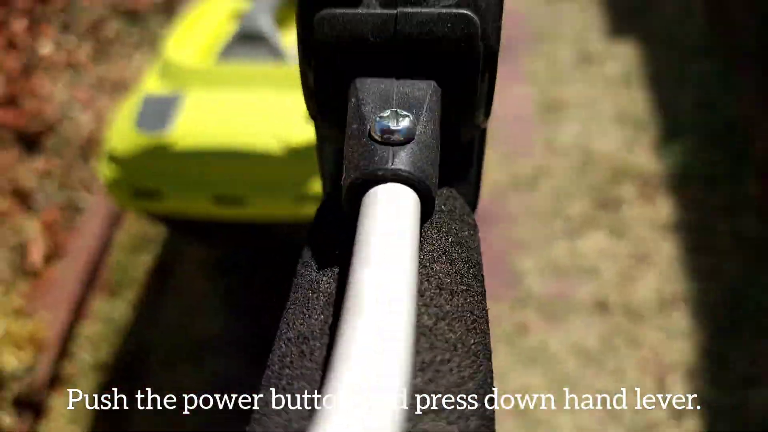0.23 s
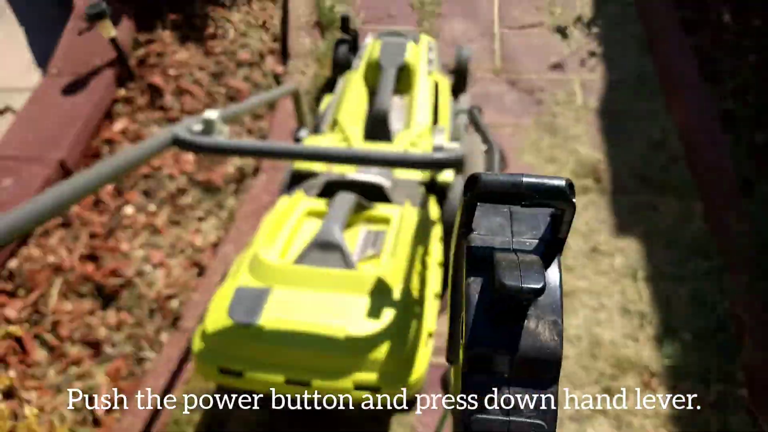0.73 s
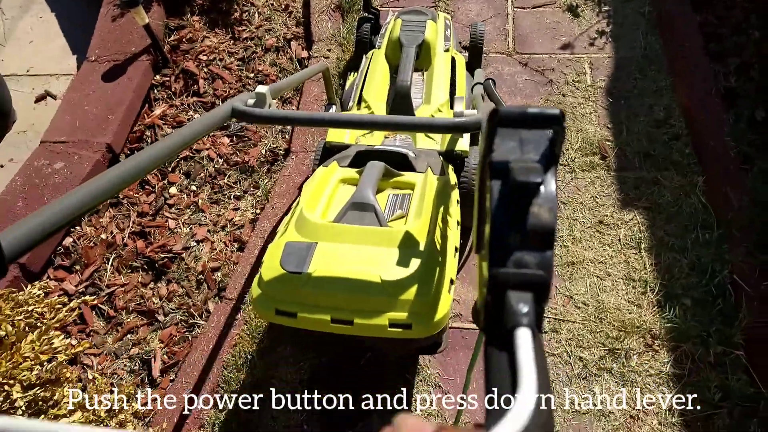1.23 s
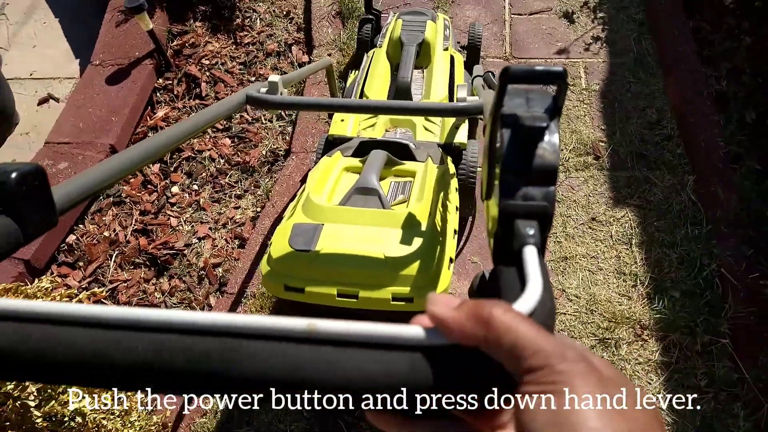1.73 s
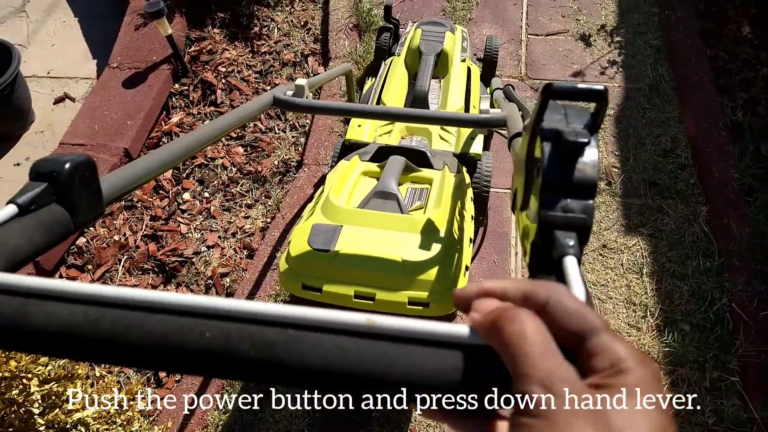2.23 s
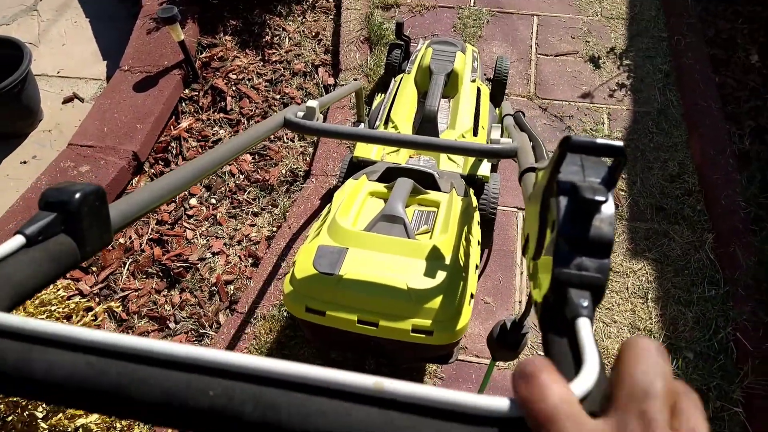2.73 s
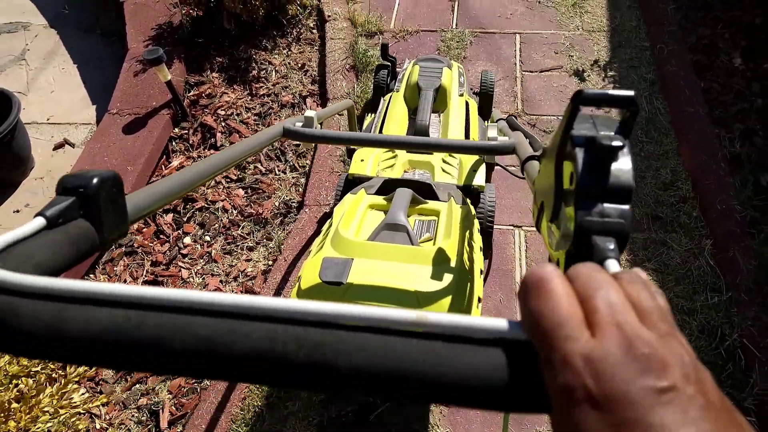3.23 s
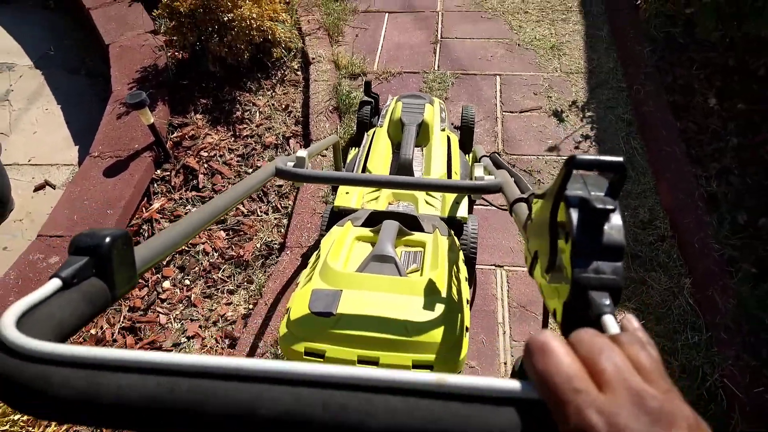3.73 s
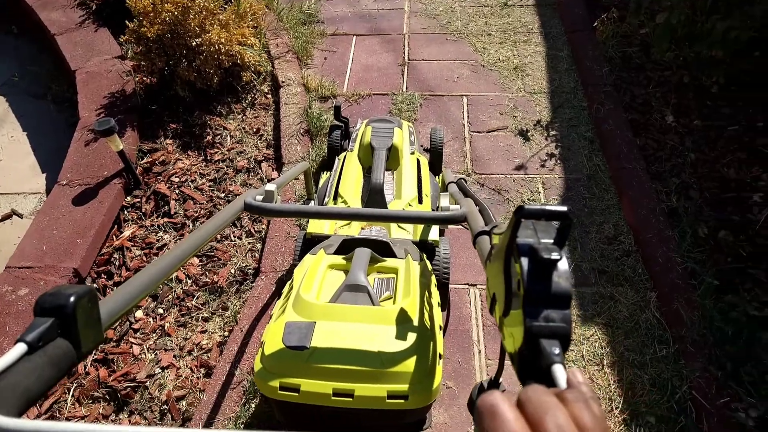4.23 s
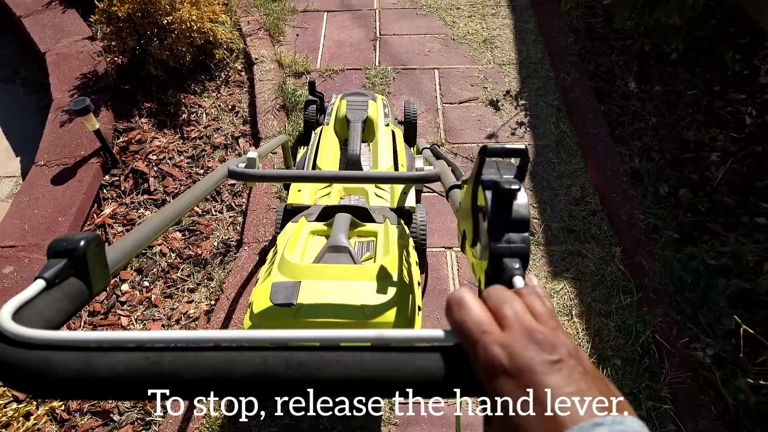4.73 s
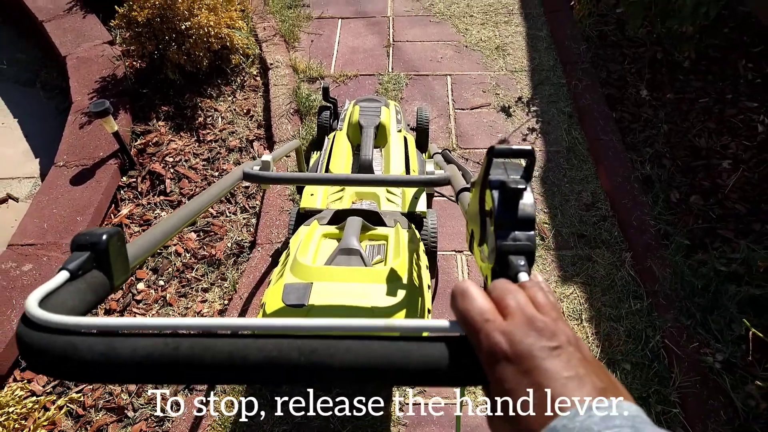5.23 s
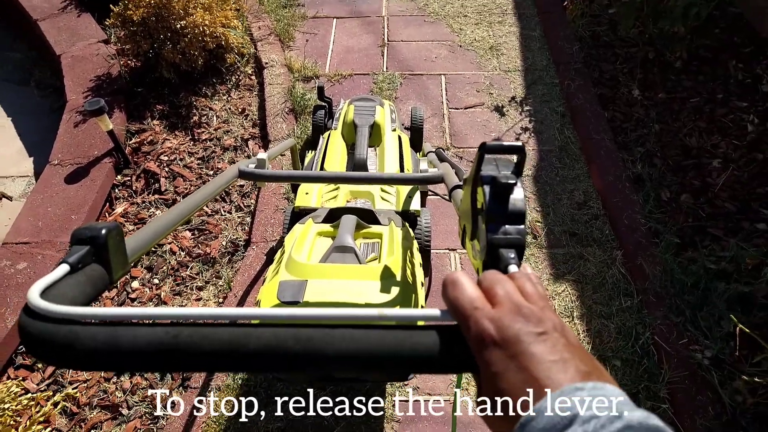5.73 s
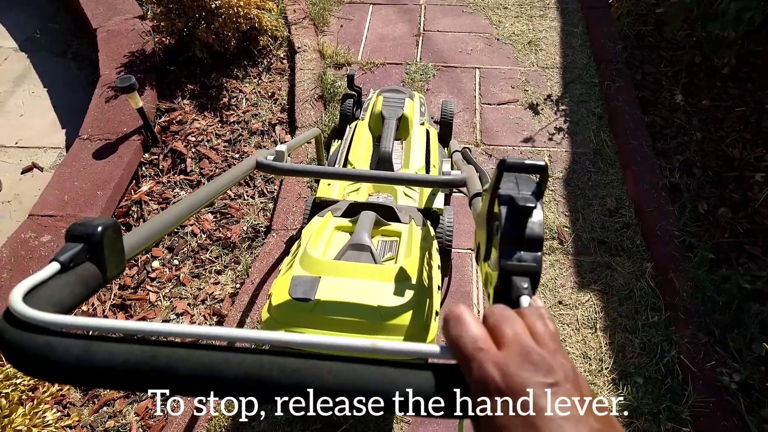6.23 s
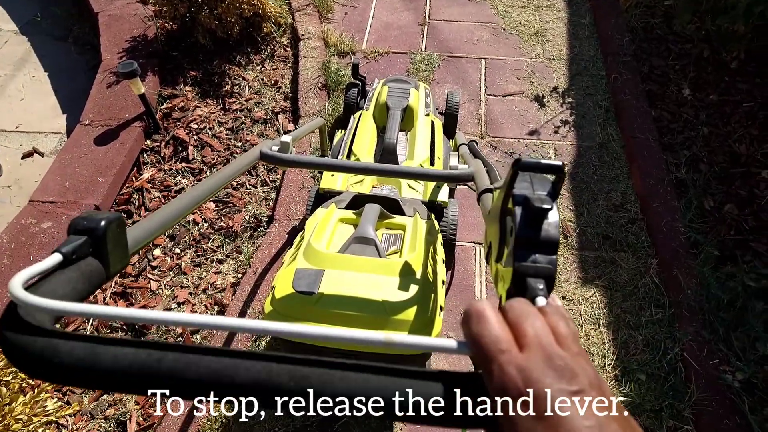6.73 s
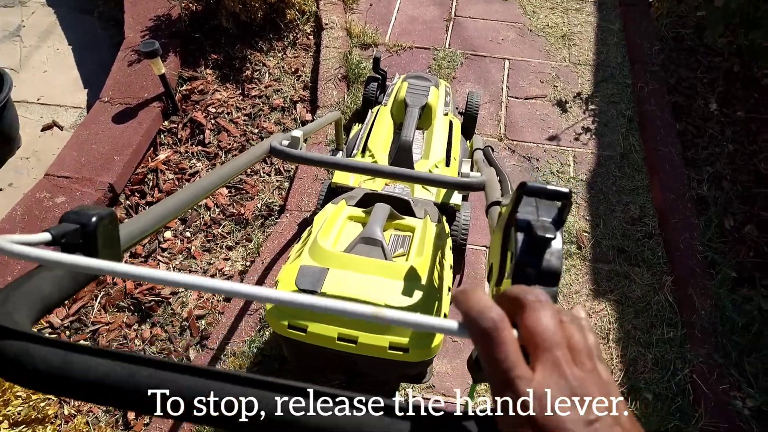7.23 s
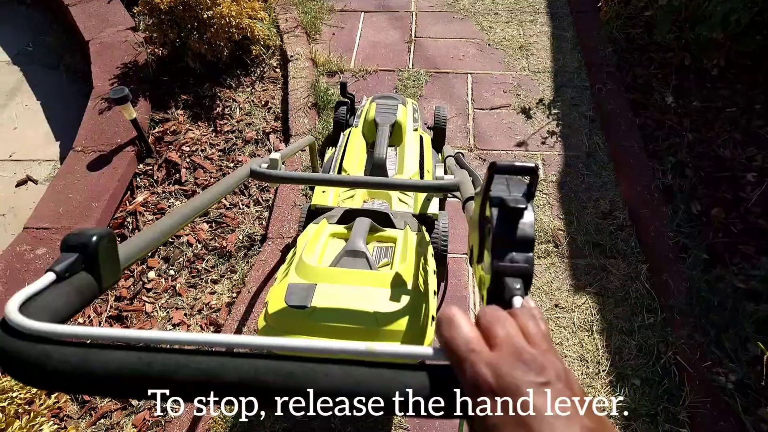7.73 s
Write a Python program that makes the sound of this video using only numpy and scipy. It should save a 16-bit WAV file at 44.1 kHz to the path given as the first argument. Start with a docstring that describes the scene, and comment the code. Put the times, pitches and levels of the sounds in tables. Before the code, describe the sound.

Steady electric mower drone with airy blade roar and shivering high whistle, a short silence, a lever double click, falling run-down, another gap, abrupt return.

```python
"""An electric mower on paving: blade-pass harmonics and turbulent air roar, chopped by the passing blade,
with the motor's whine and a whistle in the deck, as tone lines that waver, below a hand-held microphone pair.
Grit and the handle tick as short noise bursts; the lever is let go with a double click and the blade coasts.
The sound drops out twice and returns, the second time at running speed."""
import sys
import numpy as np
from scipy import signal
from scipy.fft import rfft, irfft
from scipy.io import wavfile
from scipy.ndimage import uniform_filter1d

SR = 44100
rng = np.random.default_rng(int(sys.argv[2]) if len(sys.argv) > 2 else 0)


def dump(signal):
    """Clip the signal to [-1, 1] and save it as 16-bit WAV at the path in sys.argv[1]."""
    limited = np.clip(np.atleast_2d(signal).T, -1, 1)
    pcm = np.round(limited * 32767).astype(np.int16)
    wavfile.write(sys.argv[1], SR, pcm)


N = 352359
T = np.arange(N) / SR
MOTOR_RATIO = 30 / 11  # motor turns per blade-tip pass


def gain_of(db):
    """Level definition: 20 dB is a factor of ten in amplitude."""
    return 10 ** (np.asarray(db) / 20)


def evened(x):
    """Normalisation to unit rms along the last axis."""
    return x / np.sqrt(np.mean(abs(x) ** 2, axis=-1, keepdims=True) + 1e-20)


def read(points, hz):
    """Interpolation of a spectrum table on a log-frequency axis."""
    f, value = np.transpose(points)
    return np.interp(np.log(hz + 1), np.log(f + 1), value)


def columns(rows, t):
    """Linear interpolation in time of every column of a curve table."""
    s, *values = np.transpose(rows)
    return np.array([np.interp(t, s, v) for v in values])


def drift(hz, count):
    """Narrow-band random modulation: low-passed complex noise of rms 1, hz wide."""
    step = 128  # samples between drawn values
    z = rng.standard_normal((count, N // step + 2, 2)) @ np.array([1, 1j])
    pole = np.exp(-np.pi * hz * step / SR)
    z = evened(signal.lfilter([1], [1, -pole], z))
    return np.array([np.interp(np.arange(N) / step, np.arange(z.shape[1]), row) for row in z])


def tones(turns, steady, waver_hz):
    """Phasors on given phase curves; random modulation widens a share of each line."""
    steady = np.clip(steady, 0, 1)
    size = steady + np.sqrt(1 - steady ** 2) * drift(waver_hz, count=len(turns))
    start = rng.random((len(turns), 1))
    return np.sqrt(2) * size * np.exp(2j * np.pi * (turns + start))


def resonance(hz, centre_hz, width_hz):
    """Lorentzian resonance curve with peak 1."""
    return 1 / (1 + (2 * (hz - centre_hz) / width_hz) ** 2)


RELEASE_S, COAST_PER_S = 6.94, .66  # lever let go at t/s; decay rate of the speed in 1/s


def coasting():
    """Exponential run-down under drag: share of speed left, from release to the second drop-out."""
    coasts = (T > RELEASE_S) & (T < np.mean(GAPS[1]))
    return np.where(coasts, np.exp(-COAST_PER_S * (T - RELEASE_S)), 1)


# blade speed before the spin-up lack and the coast: (t/s, tip-pass rate f/Hz)
TIP_SPEED = [(0, 122.4), (1.3, 122.6), (2.5, 123.2), (3.3, 123.1), (3.7, 122.8), (4.9, 122.7), (5.7, 122.2),
             (5.95, 121.7), (6.3, 121.5), (6.94, 121.4), (7.76, 121.7), (8, 121.6)]
SPIN_UP_LACK_HZ, SPIN_UP_S = 7, .33  # lack at the start and its time constant


def tip_speed():
    """Rotor run-up and run-down: the lacking speed and the coasting speed both decay exponentially."""
    lack = SPIN_UP_LACK_HZ * np.exp(-T / SPIN_UP_S)
    return (columns(TIP_SPEED, T)[0] - lack) * coasting()


# as the hand moves: (t/s, nearness level/dB, throb-band level/dB, treble level/dB)
HAND = [(.05, -1.5, 10.5, -4), (.3, -0.54, 7.5, -4), (.9, 0.25, 3.5, 5), (1.6, 1.34, 0.5, -4),
        (2.05, 0.4, 1, -2), (2.8, 1, -1, -1), (3.05, -2.5, -2.5, -2.5), (3.4, -4.5, -3, 0.5),
        (3.7, -6, 2.5, 1), (4.5, -4.5, 0.5, -5.5), (4.9, -6.5, 1.5, -0.5), (5.6, -5.5, 1, -4),
        (6, -1, 0, -5.5), (6.8, 0, 2, -2.5), (7.9, -1.7, 1, -4.5)]


def follow(rows, t):
    """Superposition of decibels from hand position, lost speed and the step after the first drop-out."""
    lost = 1 - np.interp(t, T, coasting())
    causes = np.array([t ** 0, *columns(HAND, t), lost, t > GAPS[0][1]])
    return np.array(rows) @ causes


# layers of air from low to high (roar, drone, throb, rush, hiss, fizz, top), on top of their colour:
# (level/dB, share of nearness, share of throb, share of treble,
#  change at standstill/dB, change after the first drop-out/dB)
AIR_LAYERS = [(1.26, 0.76, -0.22, 0.11, -12, 0.5), (1.3, 0.21, -0.43, 0.04, -21, 2.5),
              (-2, 1.24, 1.06, 0.055, -18.5, -1), (0.48, 1.16, 0.24, 0.069, -22, 1),
              (3.5, 1.04, 0.15, 0.17, -22.5, 0), (8.5, 1.14, 0.076, 0.64, -30, 0.5),
              (9, 1.4, -0.045, 0.63, -28, 0)]
# where one layer hands over to the next: f/Hz
LAYER_EDGES = [540, 870, 1350, 3400, 8200, 11800]


def air_levels(hz, t):
    """Turbulence intensity: levels of crossfaded frequency layers, with random patches on top."""
    count = len(AIR_LAYERS)
    patches = rng.standard_normal((len(hz), len(t)))
    patches = uniform_filter1d(uniform_filter1d(patches, 5, 1), 60, 0)
    steps = np.repeat(np.arange(count), 2)[1:-1]
    edges = np.outer(LAYER_EDGES, [.9, 1.1]).ravel()
    layer = np.interp(np.log(hz + 1), np.log(edges), steps)
    share = np.clip(1 - abs(layer[:, None] - np.arange(count)), 0, 1)
    share[hz < 190] = 1.4 * np.eye(count)[3]  # the deepest rumble follows the rush, more steeply
    return share @ follow(AIR_LAYERS, t) + 1.2 * patches / patches.std()


# broad resonances and dips: (f/Hz, width/Hz, left level/dB, right level/dB,
# left and right change from afar/dB, left and right change when the throb is strong/dB)
DECK_RESONANCES = [(278, 160, 1.5, 2.5, -0.23, 0, 3.5, 4), (860, 120, 0, -2.5, -1, 0, 7, 1.5),
                   (1094, 250, -0.5, 1, -1, 0, 1.5, 5), (1420, 220, 2, 5, 2, 1, -1.5, -6),
                   (1625, 130, 1, 3.5, -1, -1, 1, 1.5), (1740, 90, -1.5, 0.5, -2, -2, 5, 2.5),
                   (1875, 110, 3.5, 2.5, 1, 1, -1, -3), (2020, 70, -2, -2, -1, -1, 0, -1),
                   (2120, 76, -0.5, 2, 1, 1, -0.5, -0.5), (2470, 160, -0.5, 1, 0, 0, -2, -3.5),
                   (2720, 160, -2, -1.5, 0.15, 0, -3, -3.5), (2860, 140, 2, -0.5, 2, 2, -6.5, -3.5),
                   (3690, 560, 6, 4.5, -0.49, -0.53, 0, 1.5), (4570, 300, 0.5, 1.5, 0.55, 0.82, 2.5, 3.5),
                   (5350, 300, -0.5, 2, 2, 2, 4.5, 3.5), (5800, 250, -1, 3, 0, 0, 2, 1),
                   (7500, 520, 4, -4, 0.26, 0, -1, -2), (13620, 980, 1, -5, 0, 0, -1, 1)]
FAR_DB, THROB_DB = -7, 9  # nearness and throb level at which those changes are whole
# bands that swell for a while: (f/Hz, width/Hz)
RIDGES = [(700, 280), (1000, 270), (1870, 89), (2860, 200), (4250, 200), (13600, 1200)]
# their lift: (t/s, then level/dB for each band)
RIDGE_LIFT = [(.05, 0, 0, 4, -8, 1, -1), (.9, 0, 0.18, 0, 6, 4, 0), (1.5, -1.5, 0, 2.5, 3, 2, 0),
              (2.1, -0.5, 0, -1, -1, 6, 3), (2.8, -0.5, 0, -1, -2, -1, -3), (3.2, 1.5, 0.3, 6, 3, 0, 3),
              (3.7, 3.5, 0.85, 4, 5, 0, 6), (4.3, -1.5, 0.24, -1, 3, -1, 2),
              (4.9, 0, 0.16, -1, 0.5, -3, -2), (5.6, -3, 1, -1, -2, -3, -2.5),
              (6, -1, 2.2, -1.5, -4, -2, -1), (6.9, 0.5, 0.22, 0, -1.5, 1, -1.5), (7, 0, 0, 0, -1, -1, 0),
              (7.15, -1, 0.053, 1, 2, 2, 0), (7.35, 0, 0, 0, -1, 1, 1), (7.55, 1.5, 0, -4, -1, 0, 0),
              (7.8, 0.5, 2, 3, -2, 0, -1)]
RIPPLE_DB = 1.5


def deck_response(hz, t):
    """Resonance and interference: broad peaks, swelling bands and narrow drifting reflection ridges."""
    near_db, throb_db, _ = columns(HAND, t)
    shapes = sum(np.outer(db, resonance(hz, f, width)) for f, width, *db in DECK_RESONANCES)[:, :, None]
    deck_db = shapes[:2] + shapes[2:4] * near_db / FAR_DB + shapes[4:] * throb_db / THROB_DB
    for (f, width), lift_db in zip(RIDGES, columns(RIDGE_LIFT, t)):
        deck_db += np.outer(resonance(hz, f, width), lift_db)
    ripple = rng.standard_normal((2, len(hz), len(t)))  # other for each microphone
    ripple = uniform_filter1d(uniform_filter1d(ripple, size=3, axis=1), size=200, axis=2)
    return deck_db + RIPPLE_DB * evened(ripple) * (hz > 700)[:, None]


# relative noise spectrum of the air: (f/Hz, density level/dB)
AIR_COLOUR = [(18, -76), (30, -47), (108, -29), (173, -12), (342, -4.5), (421, -12), (493, -6.5),
              (1050, -15), (3240, -19.5), (4000, -18.5), (4800, -25), (7490, -22.5), (11100, -41),
              (13700, -34), (15600, -47.5)]
# likeness of the two microphones: (f/Hz, share from 0 to 1)
LIKENESS = [(60, 1), (300, 0.94), (700, 0.54), (1150, 0.3), (1700, 0.31), (2300, 0.86), (3200, 0.55),
            (6000, 0.43), (12000, 0.21)]
# balance of the two microphones: (f/Hz, left over right level/dB)
TILT = [(60, 7), (110, 6), (200, -2.5), (380, -0.5), (700, -3), (1290, -2), (2380, -0.5), (4400, 0.5),
        (8120, -1), (15000, -1.5)]
AIR_LEAN_DB = 0.8  # treble air, left over right, on top of the balance
AIR_LAG = 19  # samples by which treble reaches the left microphone later


def air(passes):
    """Turbulent noise with partial coherence; amplitude modulation by the tips chops it above 700 Hz."""
    frames, hz = N // 256 + 5, np.fft.rfftfreq(1024, 1 / SR)
    t = np.arange(frames) * 256 / SR
    colour_db = read(AIR_COLOUR, hz)
    size = gain_of(colour_db[:, None] + deck_response(hz, t) + air_levels(hz, t))
    size /= np.linalg.norm(gain_of(colour_db))
    a, b, c, d = rng.standard_normal((4, len(hz), frames))
    left, other = a + 1j * b, c + 1j * d
    same = np.clip(read(LIKENESS, hz), -1, 1)[:, None]
    lag = 2 * np.pi * hz * AIR_LAG / SR * np.clip((hz - 1200) / 600, 0, 1)  # bass arrives at both at once
    right = (same * left + np.sqrt(1 - same ** 2) * other) * np.exp(1j * lag)[:, None]
    lean_db = np.clip(hz / 1500, 0, 1) * AIR_LEAN_DB + read(TILT, hz)
    lean = gain_of(lean_db[:, None] / 2)
    z = np.array([left * lean, right / lean]) * size
    low = signal.istft(z * (hz < 700)[:, None], nperseg=1024, noverlap=768)[1][:, :N]
    high = signal.istft(z * (hz >= 700)[:, None], nperseg=1024, noverlap=768)[1][:, :N]
    chop = 1 + sum(m * np.cos(2 * np.pi * (k + 1) * passes) for k, m in enumerate([.22, .22, .08]))
    return gain_of(-22) * (low + high * chop)


# low tones: (level/dB, share of nearness, share of throb, share of treble,
# change at standstill/dB, change after the first drop-out/dB)
HUM_LEVELS = [(-32, 0.79, 0.48, 0.0026, -34.5, 3.5), (-29.5, 1.7, 0.85, 0.0011, -24, -4),
              (-25, 0.97, 0.039, 0, 9, -1.5), (-26, 1.15, -0.043, 0.0035, -11.5, 0),
              (-29.5, 0.53, -1.3, 0.0042, -83, 3.5), (-37.5, 0, -.3, 0, -32, 3.5),
              (-47.5, 0.66, 0.29, 0.00079, 22, 7), (-43, .6, 0, 0, 0, 3.5), (-48, 0.42, .3, 0, -20.5, 4),
              (-45, 1, -0.01, 0.0044, -27.5, -2.5)]
# their frequencies in multiples of the tip pass
HUM_ORDERS = [1, 2, MOTOR_RATIO, 3, 4, 5, 7, 6, 8, 9]
# phase by which the left microphone lags, for each tone: (angle/rad)
HUM_LAG = [.6, .2, .3, .05, .1, .1, .1, .1, .2, .3]
# tones swell and sink as microphones and pitch move:
# (t/s, level/dB on the 2nd, motor, 3rd, 7th, 9th, 1st, 5th order)
HUM_SWELL = [(.05, -2, 1, 5, -1, -1, 1.5, 0), (.5, 4, 0, -2, 13, 3.5, -0.5, 0),
             (.95, -1.5, -1, -4, -4, 3, -2, 0), (1.4, -2.5, 0, -8, -5, 3, -0.5, 0),
             (2.1, 1.5, 0.5, 2, -2, -9, 2, 0), (2.8, -1.5, -0.5, 1, -1, -9, -1.5, 0),
             (3.3, -2, 2.5, 5, -10, -6, 1.5, 0), (3.7, 1, 2.5, -1.5, -7, -4.5, 0.5, 0),
             (4.9, 0.5, -1, -1.5, 8, -4, 0.5, 0), (5.6, -3, -1.5, 0, 2, 0, -0.5, 0),
             (6, 4.5, 0.5, 0.5, 3.5, -3, -0.5, 0), (6.9, -2, 0.5, 2.5, 0, -6, -0.5, 0),
             (7.07, 0.5, -1, 0, -3, -3.5, 1.5, 5), (7.2, 1, 4, 4.5, 1, -1, 2, 4),
             (7.32, -1, 2.5, 1.5, 3, -3, 4, 2), (7.42, -1, -1.5, -2, -2, -3, 1, -3),
             (7.55, 3, 0.5, -3, -4, -3, -2, 0), (7.8, 5, 1, 2, 6.5, -3, 0, 0)]
# index of the low tone that each swell column moves
SWELL_ROWS = [1, 2, 3, 6, 9, 0, 5]
# weak tones: multiples of the tip pass
FAINT_ORDERS = [.5, 2 * MOTOR_RATIO, 4 * MOTOR_RATIO, 11, 15, 17, 21]
# their level/dB on top of the roar layer's level
FAINT_LEVELS = [-57, -40, -50, -50, -49.5, -49, -51.5]


def hum(passes, roar_db):
    """Harmonic series of a rotor: blade and motor-shaft orders, nearly alike in both microphones."""
    level_db = follow(HUM_LEVELS, T)
    level_db[SWELL_ROWS] += columns(HUM_SWELL, T)
    strong = gain_of(level_db) * tones(np.outer(HUM_ORDERS, passes), .99, 5)
    faint = gain_of(roar_db + np.c_[FAINT_LEVELS]) * tones(np.outer(FAINT_ORDERS, passes), 0.88, 3.8)
    half_lag = np.exp(.5j * np.c_[HUM_LAG])
    pair = np.array([(strong / half_lag).real.sum(0), (strong * half_lag).real.sum(0)])
    return pair + faint.real.sum(0)


# main high lines before they sink in the coast: (t/s, deck whistle left level/dB, right level/dB,
# motor whine left level/dB, right level/dB)
MAIN_LINES = [(.05, -24.5, -30, -36, -53), (.17, -22, -35, -27, -40), (.45, -28.5, -21.5, -48, -35),
              (.95, -26.5, -64, -59, -42), (1.5, -25, -21, -44, -54), (2.3, -24, -26.5, -45, -38),
              (2.9, -22.5, -27, -35, -48), (3.2, -26, -26, -46, -42), (3.35, -27, -24.5, -40, -35),
              (3.7, -47, -25.5, -27, -36), (4.1, -36, -23, -29.5, -41), (4.55, -31, -31.5, -34.5, -39),
              (4.75, -38, -55, -44.5, -31.5), (5.6, -38.5, -48, -35.5, -30),
              (6.05, -28.5, -54.5, -28.5, -32), (6.5, -26.5, -46, -30, -26.5),
              (6.9, -27.5, -36.5, -36, -26), (7.02, -34, -39.5, -43, -40.5), (7.07, -27, -36, -37, -37),
              (7.13, -25, -33, -35.5, -30), (7.18, -27, -34.5, -38.5, -30.5),
              (7.23, -32, -37.5, -45, -35.5), (7.3, -37, -56, -43, -44), (7.38, -33, -50, -41, -42),
              (7.44, -42, -52, -39, -39), (7.55, -50.5, -54.5, -55.5, -44), (7.8, -33.5, -43.5, -29.5, -32)]


def main_levels(speed):
    """Near-field mix: each microphone has its own levels, which sink once the speed is far down."""
    return columns(MAIN_LINES, T) - 60 * np.clip(122.5 / speed - 1.3, 0, 1)


def side_loss(speed):
    """Modulation depth falls with speed: level change of side lines below running speed, in dB."""
    return -200 * np.clip(122.5 / speed - 1.04, 0, 1)


COAST_BREAKUP = .85  # share of steadiness lost per share of speed lost: coasting lines turn rough


def line_family(main, sides, main_db, sides_db, steady, waver_hz, lag):
    """Main line and side lines with random modulation, delayed on the left."""
    steady = steady - COAST_BREAKUP * (1 - coasting())
    lines = tones(np.r_[main[None], sides], steady, waver_hz).real
    out = np.zeros((2, N))
    for ear in range(2):
        # side lines fade slowly at random, apart in each microphone
        fading_db = 2 * drift(.3, count=len(sides)).real
        heard_db = np.r_[main_db[ear][None], sides_db + fading_db]
        out[ear] = np.roll((gain_of(heard_db) * lines).sum(0), lag * (1 - ear))
    return out


# side lines of the whistle: mostly whole tip passes away, one about half a pass below
WHISTLE_STEPS = [-3, -2, -1, -.45, 1, 2, 3, 4]
# their level/dB against the whistle as the louder microphone hears it
WHISTLE_SIDES = [-25, -25, -21, -17.5, -13.5, -21, -26, -26]
WHISTLE_HZ, WHISTLE_WAVER_HZ = 3890, 45  # pitch near running speed; width of the random waver
WHISTLE_LAG = 21  # samples by which it reaches the left microphone later


def deck_whistle(speed, passes):
    """Flow-excited whistle: air speed pulls its shivering pitch, and side lines flank it."""
    wobble_hz = 5 * drift(40, count=1)[0].real
    whistle = np.cumsum(WHISTLE_HZ * (speed / 122.5) ** .08 + wobble_hz) / SR
    sides = whistle + np.outer(WHISTLE_STEPS, passes)
    main_db = main_levels(speed)[:2]
    sides_db = main_db.max(0) + side_loss(speed) / 2 + np.c_[WHISTLE_SIDES]
    return line_family(whistle, sides, main_db, sides_db, .94, WHISTLE_WAVER_HZ, WHISTLE_LAG)


# side lines around the whine, whole tip passes away from it: multiples of the tip pass
WHINE_ORDERS = [38, 56, 57, 58, 59, 61, 62, 63, 64, 65, 68]
# their level/dB on top of the hiss layer's level
WHINE_SIDES = [-53.5, -46, -58, -49, -55, -47, -45, -53, -46, -54, -45]
WHINE_LAG = 18  # samples by which it reaches the left microphone later


def motor_whine(speed, passes, hiss_db):
    """Rotation-locked whine at 60 tip passes, with side lines whole tip passes away from it."""
    main_db = main_levels(speed)[2:]
    follow_db = 0.26 * (main_db.max(0) + 33.5)  # side lines follow the main line weakly
    sides_db = hiss_db + side_loss(speed) + follow_db + np.c_[WHINE_SIDES]
    sides = np.outer(WHINE_ORDERS, passes)
    return line_family(60 * passes, sides, main_db, sides_db, .985, 15, WHINE_LAG)


# the lower motor line before it sinks with speed: (t/s, level/dB on top of the hiss layer's level)
SLOT_LEVEL = [(.05, -41), (.15, -42), (.3, -44), (.6, -41.5), (.95, -48.5), (1.75, -43.5), (2.5, -50.5),
              (3.1, -60), (3.6, -45.5), (4.9, -42), (5.6, -39.5), (6, -41.5), (6.8, -40), (7.8, -42.5)]
SLOT_ORDER = 16 * MOTOR_RATIO  # in tip passes
SLOT_COAST_DB, SLOT_MATE_DB = -160, -9  # change at standstill; weaker line one motor order below


def lower_motor_line(speed, passes, hiss_db):
    """Shaft-order pair: a thin line at 16 motor turns and its mate at 15, sinking with speed."""
    level_db = hiss_db + columns(SLOT_LEVEL, T)[0] + SLOT_COAST_DB * np.clip(1 - speed / 121.4, 0, 1)
    lines = tones(np.outer([SLOT_ORDER, SLOT_ORDER - MOTOR_RATIO], passes), .96, 15).real
    slot = gain_of(level_db) * (gain_of([0, SLOT_MATE_DB]) @ lines)
    return np.array([np.roll(slot, WHINE_LAG), slot])


# faint motor lines, in multiples of the tip pass
COAST_ORDERS = [24 * MOTOR_RATIO, 32 * MOTOR_RATIO]
COAST_RING_HZ, COAST_RING_WIDTH_HZ, COAST_RING_DB = 7100, 600, -45


def coast_ring(speed, passes):
    """Swept resonance: faint motor lines ring as they slide through 7 kHz."""
    offset = 2 * (np.outer(COAST_ORDERS, speed) - COAST_RING_HZ) / COAST_RING_WIDTH_HZ
    through = 1 / (1 + offset ** 4)
    ring = gain_of(COAST_RING_DB) * (through * tones(np.outer(COAST_ORDERS, passes), .7, 15).real).sum(0)
    return np.array([np.roll(ring, WHINE_LAG), ring])


HAND_LAG = 8  # samples by which sounds at the handle reach the left microphone later
CLICK_LIKENESS = 0.5  # of the two microphones


def add_click(out, s, db, centre_hz, lean_db, spread, ms, rise_ms):
    """Impact excitation: band-shaped noise with a linear rise and a Gaussian decay."""
    hz, t_ms = np.fft.rfftfreq(1024, 1 / SR), 1000 * np.arange(1024) / SR
    colour = 1 / (1 + ((hz - centre_hz) / (spread * centre_hz)) ** 2)
    colour *= hz / (hz + centre_hz / 5)  # less bass
    a, b = rng.standard_normal((2, 1024))
    other = CLICK_LIKENESS * a + np.sqrt(1 - CLICK_LIKENESS ** 2) * b
    burst = irfft(rfft([a, other]) * colour)
    burst *= np.minimum(t_ms / rise_ms, 1) * np.exp(-(t_ms / max(ms, .3)) ** 2)
    burst *= gain_of(db + np.c_[[lean_db, -lean_db]] / 2) / abs(burst).max(1, keepdims=True)
    at = round(s * SR)
    out[0, at + HAND_LAG:at + HAND_LAG + 1024] += burst[0]
    out[1, at:at + 1024] += burst[1]


# grit and handle ticks: (t/s, peak level/dB before the left-right lean, decay length/ms)
TICKS = [(1.0555, -12, 3.4), (1.085, -22, 3.4), (1.1194, -19, 3.4), (1.451, -15, 3.4), (1.648, -10, 3.9),
         (3.4294, -25, 4), (3.6491, -21, 3), (3.654, -23, 8), (3.6825, -21, 3), (3.718, -21, 8.6),
         (3.7658, -23, 7), (3.9005, -26, 5), (4.4802, -31, 3), (4.5062, -30, 3), (5.1816, -24, 3),
         (5.187, -30, 6), (5.355, -25, 1.95), (5.568, -21, 2), (5.589, -26.5, 9), (6.1413, -26.5, 3.4),
         (6.7136, -17, 3.4)]
TICK_HZ, TICK_SPREAD = 8000, 0.8  # centre, and half-width as a share of it
TICK_LEAN_DB, TICK_RISE_MS = 5, .16  # left over right; rise time


def ticks():
    """Impulsive contact: short bright bursts from grit and the handle."""
    out = np.zeros((2, N))
    for s, db, ms in TICKS:
        add_click(out, s, db, TICK_HZ, TICK_LEAN_DB, TICK_SPREAD, ms, TICK_RISE_MS)
    return out


# a double click of the lever, built from short overlapping bursts of different colour:
# (t/s, peak level/dB before the lean, centre f/Hz, left over right level/dB)
LEVER_BURSTS = [(6.9333, -3, 5500, 5), (6.9505, -3, 5800, 0), (6.9507, -9, 1500, 0), (6.9525, -10, 4800, 0),
                (6.9546, -9, 1800, 1), (6.9566, -8, 3900, 1.5)]
LEVER_SPREAD, LEVER_MS, LEVER_RISE_MS = .5, 2.6, .7  # half-width as share of centre; decay; rise


def lever_click():
    """Impact sound by superposition: short overlapping bursts of different colour make a double click."""
    out = np.zeros((2, N))
    for s, db, centre_hz, lean_db in LEVER_BURSTS:
        add_click(out, s, db, centre_hz, lean_db, LEVER_SPREAD, LEVER_MS, LEVER_RISE_MS)
    return out


def scene():
    """Superposition: all rotor sounds share one phase curve, and the clicks are added."""
    speed = tip_speed()
    passes = np.cumsum(speed) / SR
    roar_db, _, _, _, hiss_db, *_ = follow(AIR_LAYERS, T)
    out = air(passes) + hum(passes, roar_db)
    out += deck_whistle(speed, passes) + motor_whine(speed, passes, hiss_db)
    out += lower_motor_line(speed, passes, hiss_db) + coast_ring(speed, passes)
    return out + ticks() + lever_click()


# silences: (start t/s, end t/s)
GAPS = [(5.7066, 5.9475), (7.568, 7.7795)]
EDGE_HZ = 15600


def record(dry):
    """Gating and band limiting: two sharp drop-outs with a short fade back in, then a low-pass filter."""
    gate = np.ones(N)
    for stop, start in GAPS:
        fade_in = np.clip((T - start) / .003, 0, 1)
        fade_in *= 1 - .55 * np.exp(-abs(T - start) / .04)  # the level is low at first and recovers
        gate *= np.where(T < stop, 1, fade_in)
    low_pass = signal.firwin(511, EDGE_HZ, window=("kaiser", 9), fs=SR)
    return signal.oaconvolve(dry * gate, low_pass[None], "same")


dry = scene()
out = record(dry)
dump(out)
```